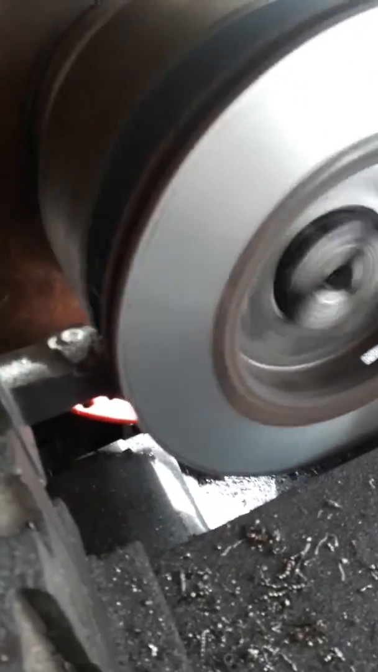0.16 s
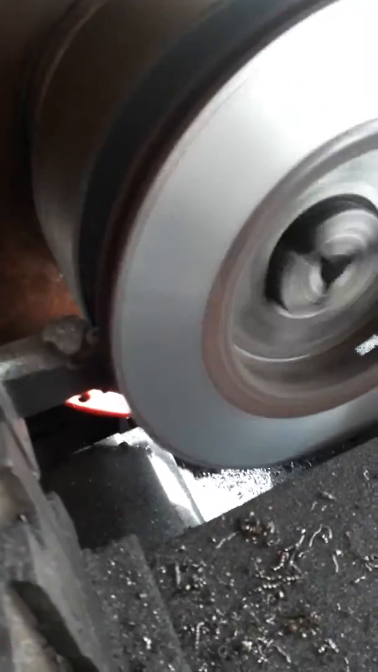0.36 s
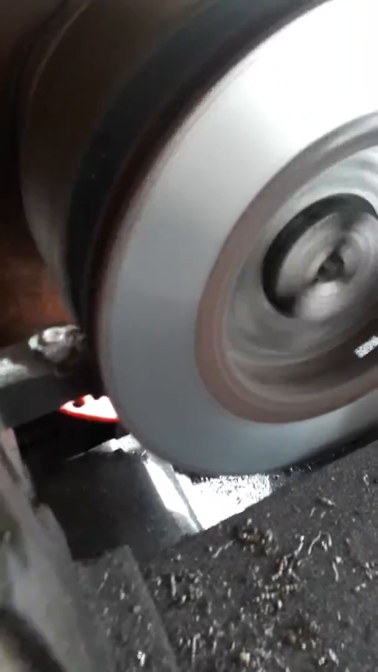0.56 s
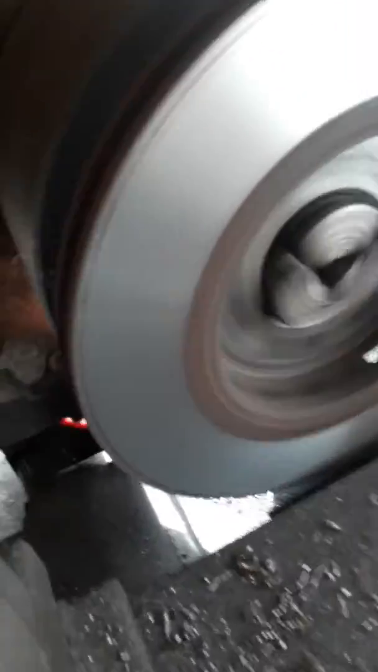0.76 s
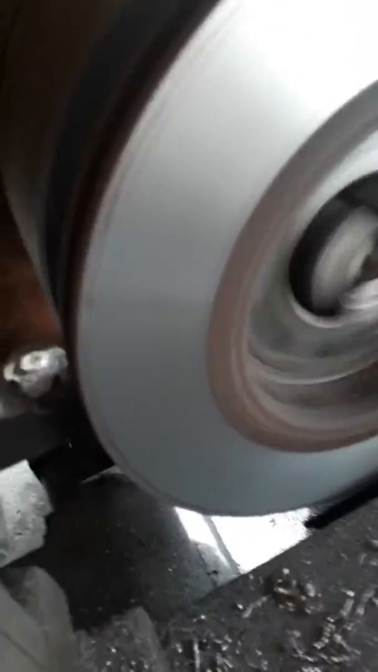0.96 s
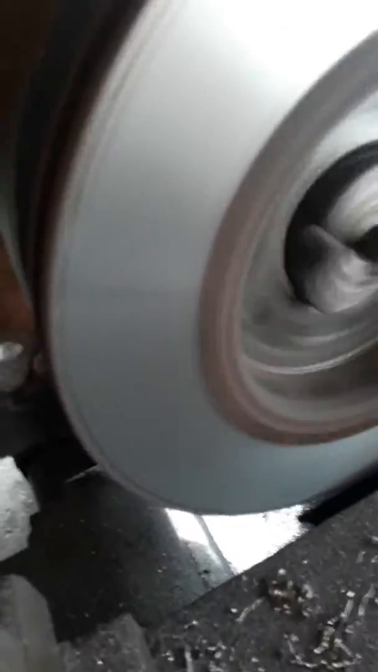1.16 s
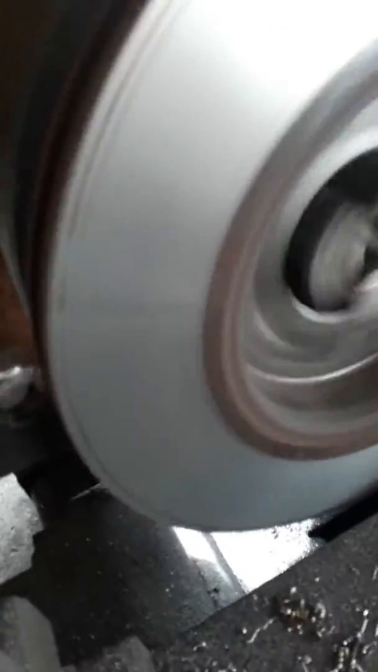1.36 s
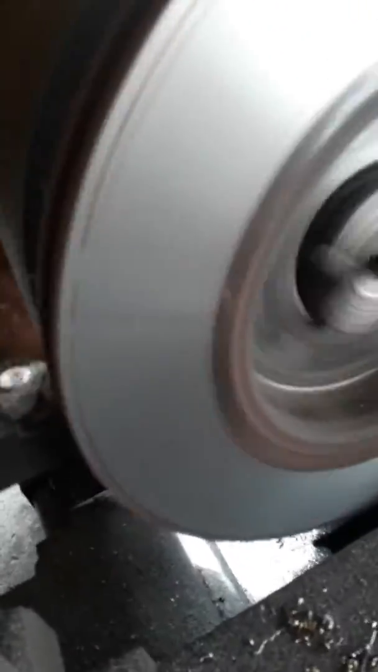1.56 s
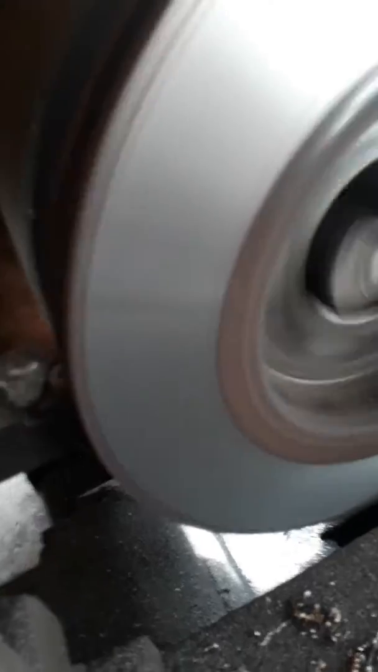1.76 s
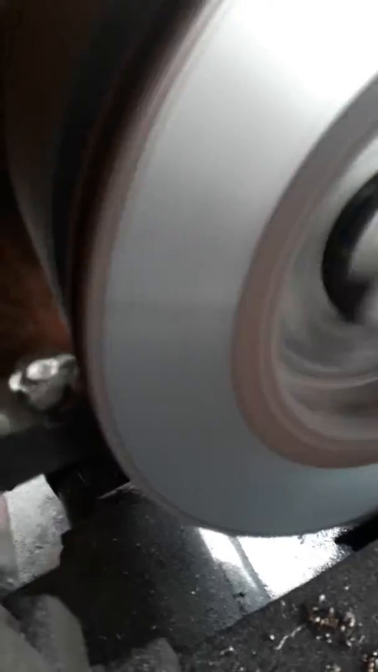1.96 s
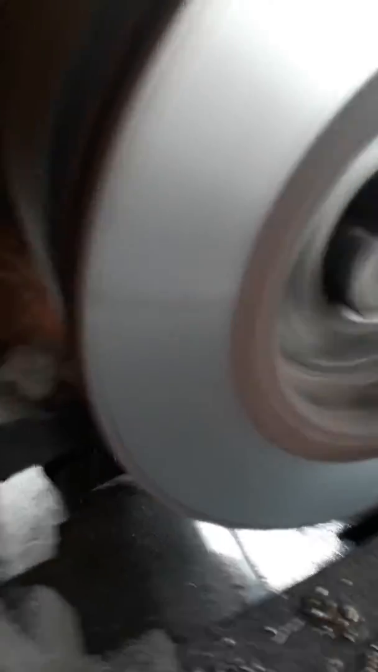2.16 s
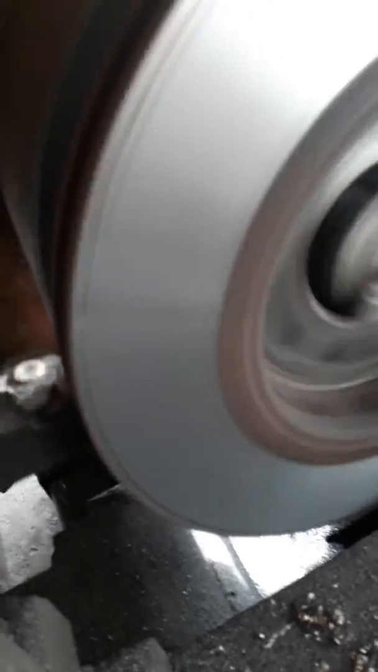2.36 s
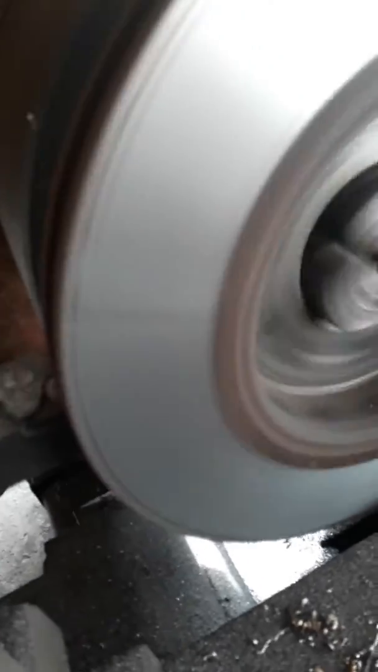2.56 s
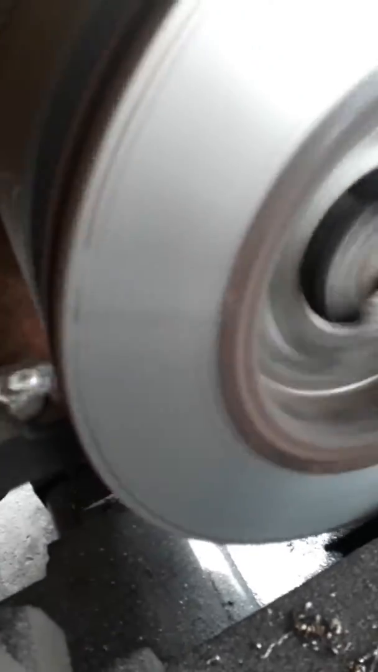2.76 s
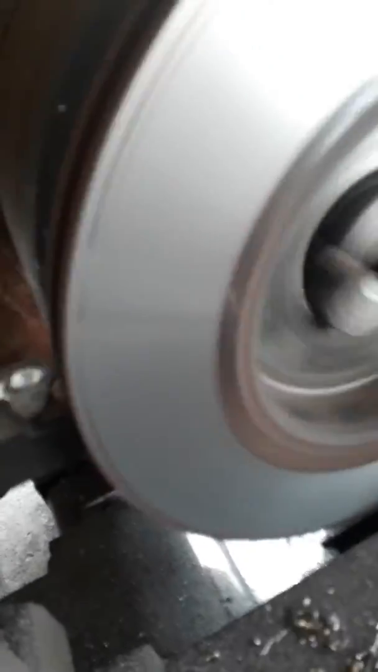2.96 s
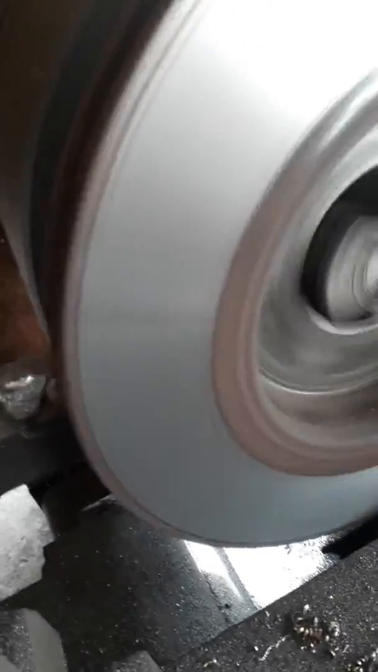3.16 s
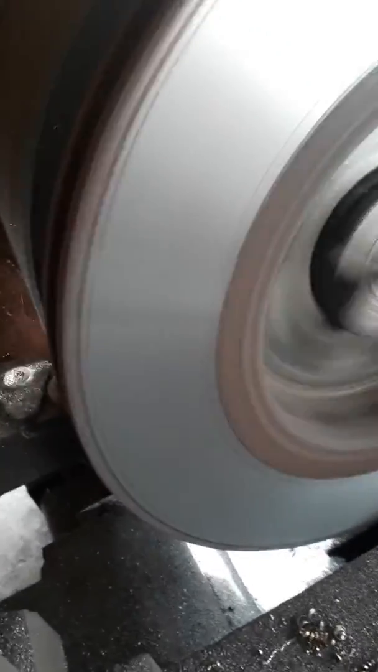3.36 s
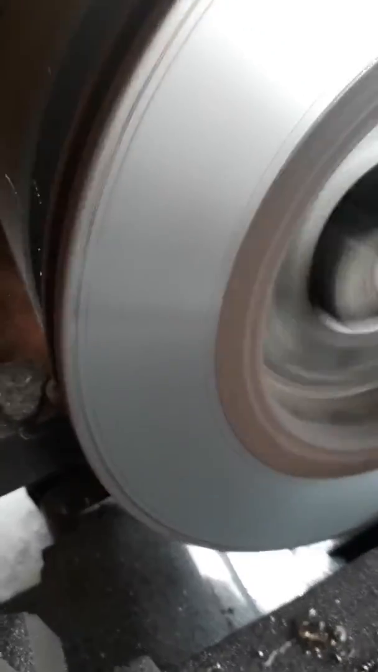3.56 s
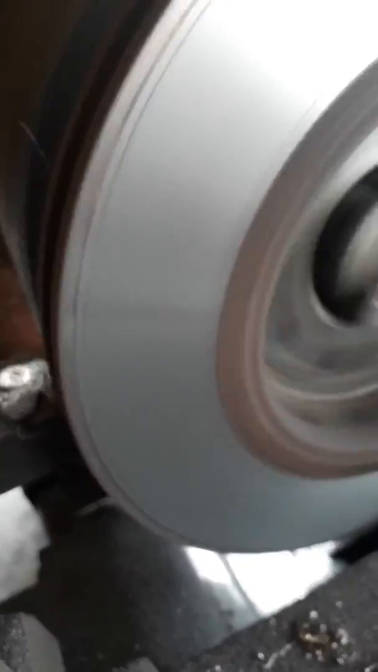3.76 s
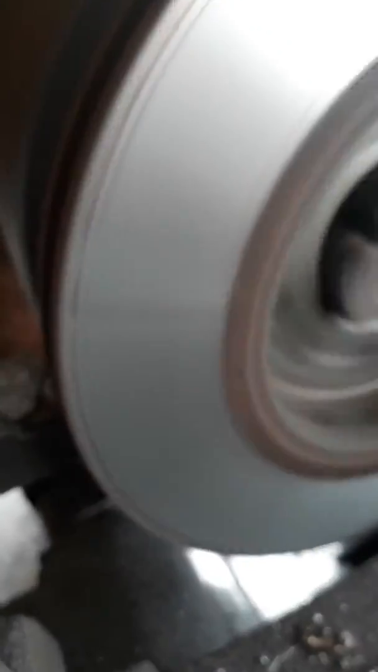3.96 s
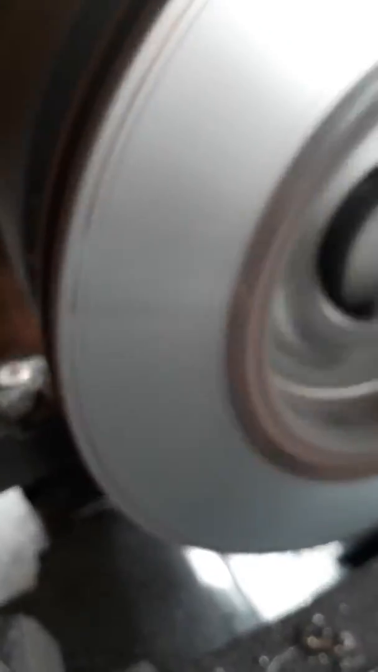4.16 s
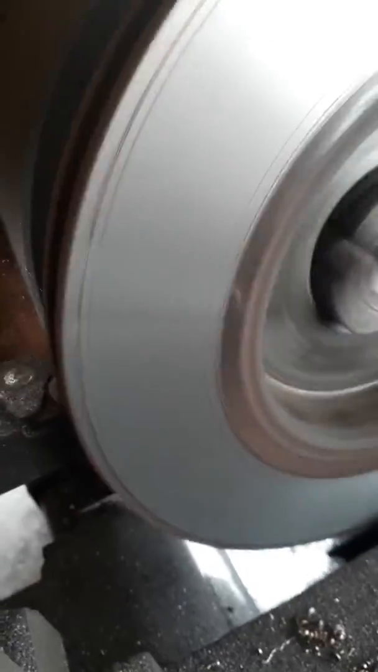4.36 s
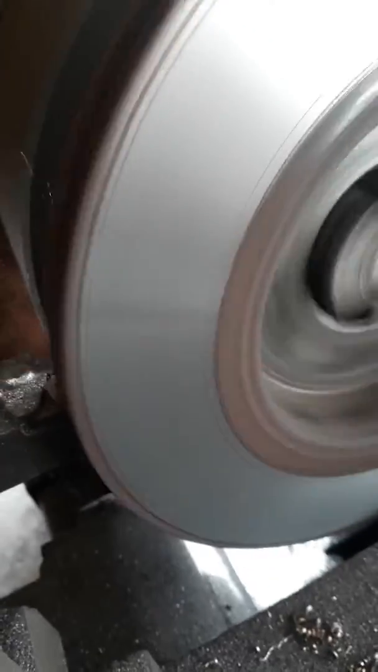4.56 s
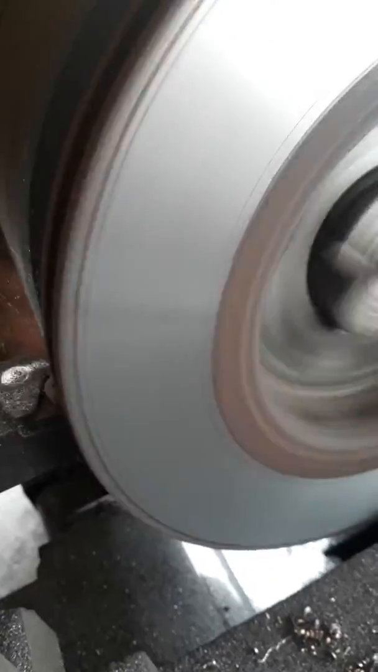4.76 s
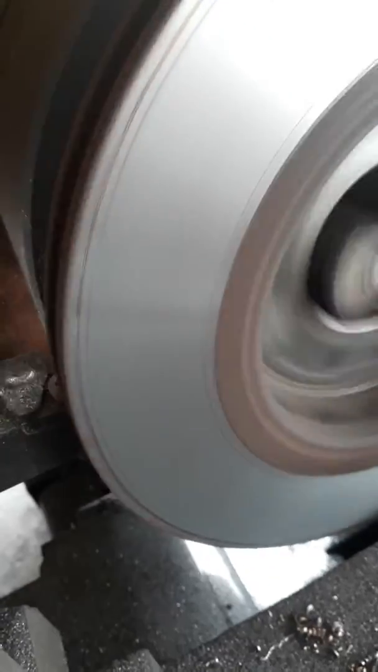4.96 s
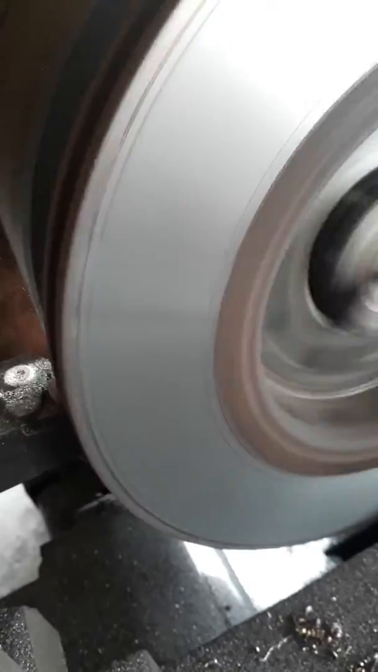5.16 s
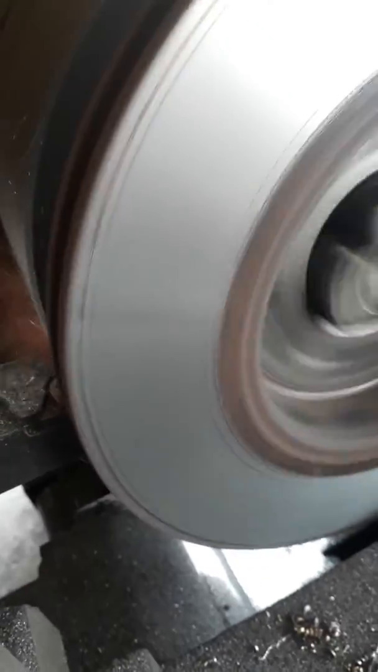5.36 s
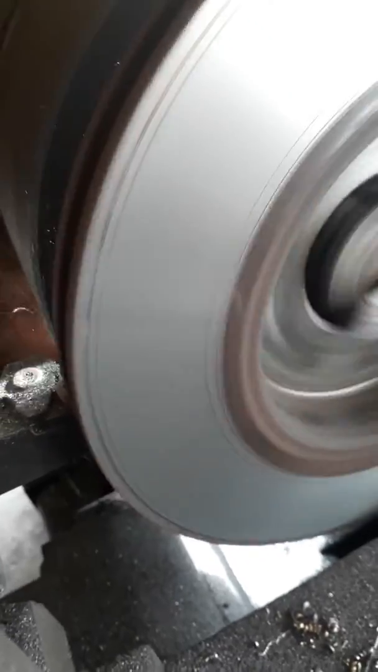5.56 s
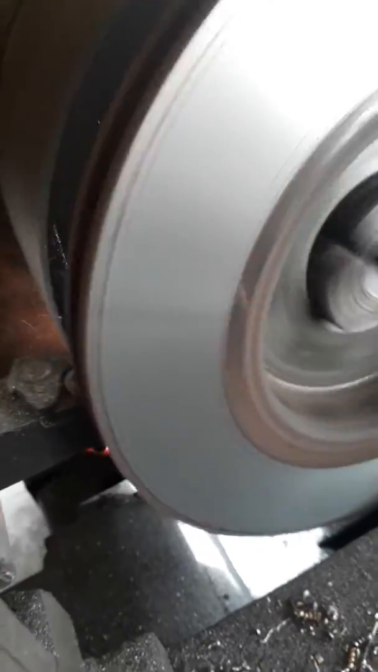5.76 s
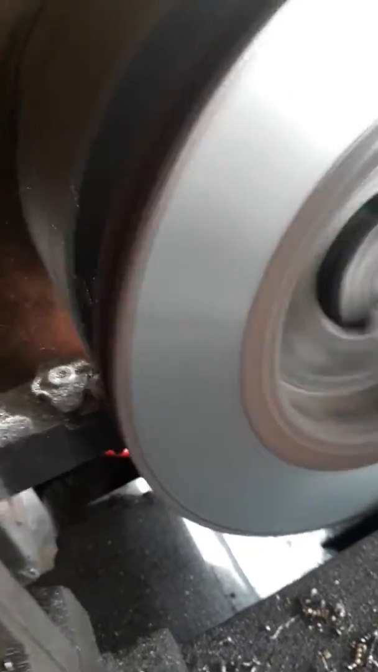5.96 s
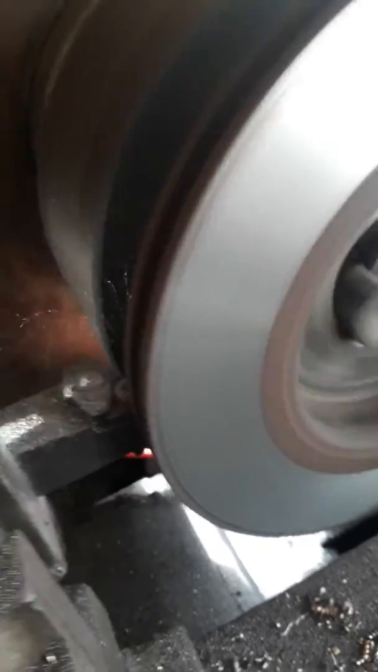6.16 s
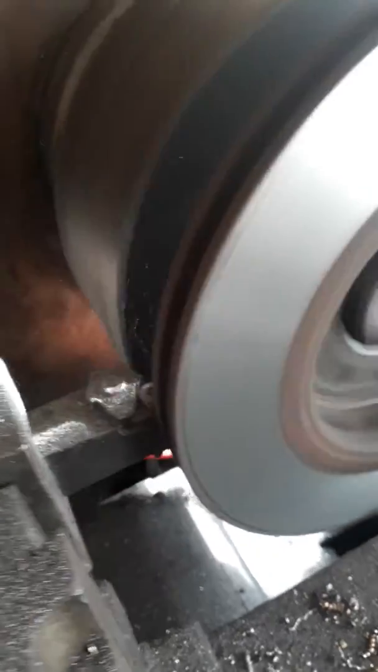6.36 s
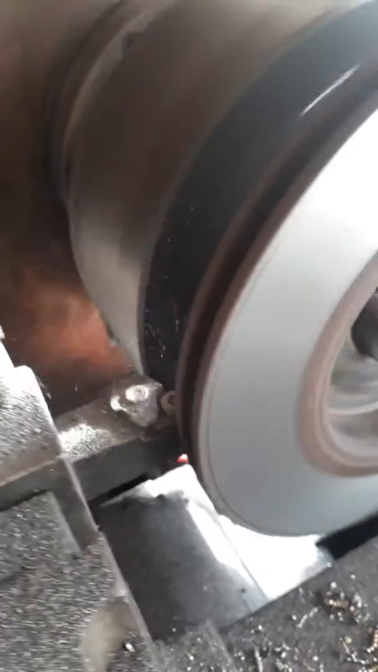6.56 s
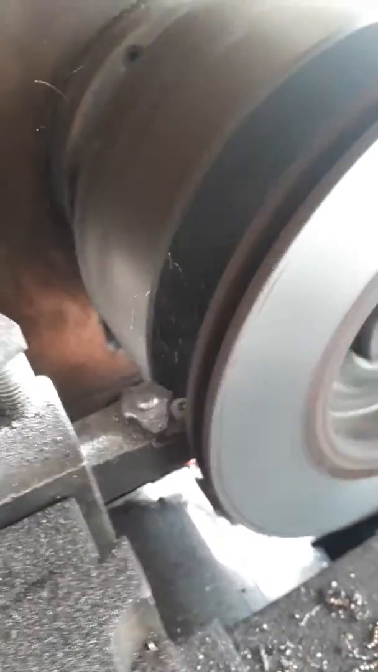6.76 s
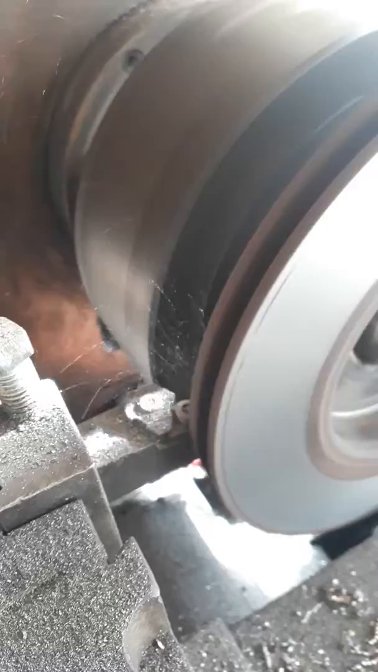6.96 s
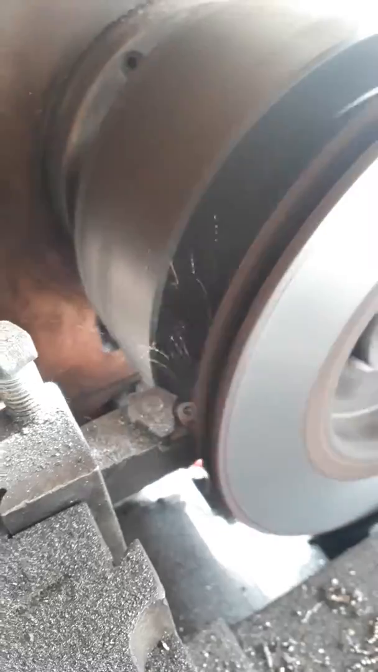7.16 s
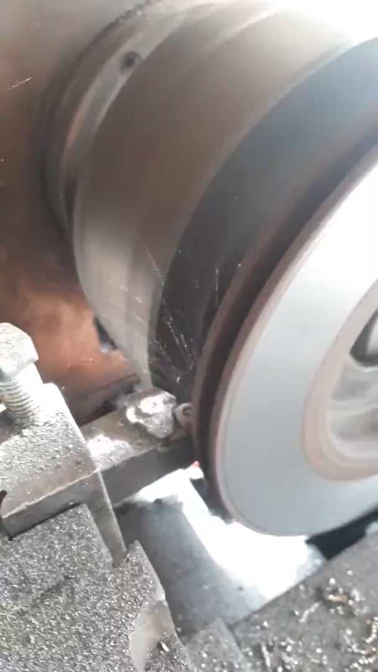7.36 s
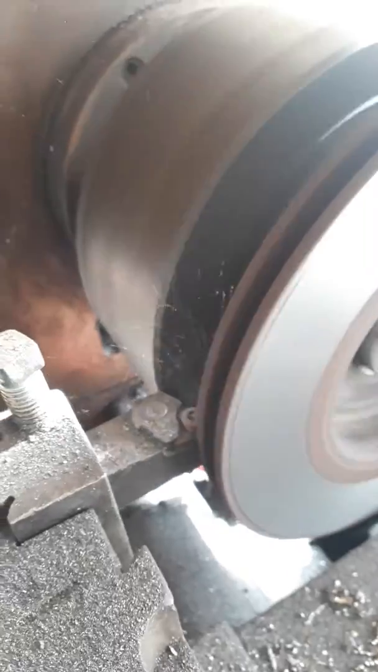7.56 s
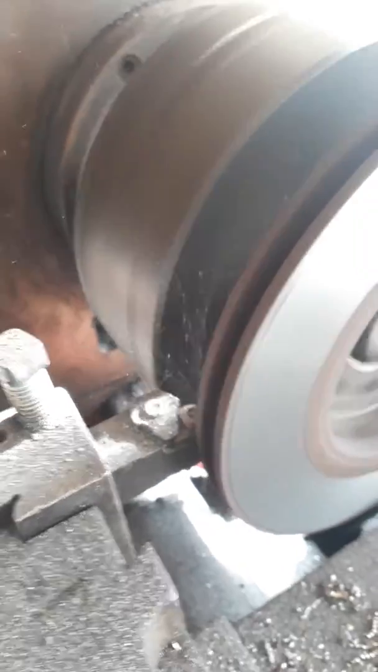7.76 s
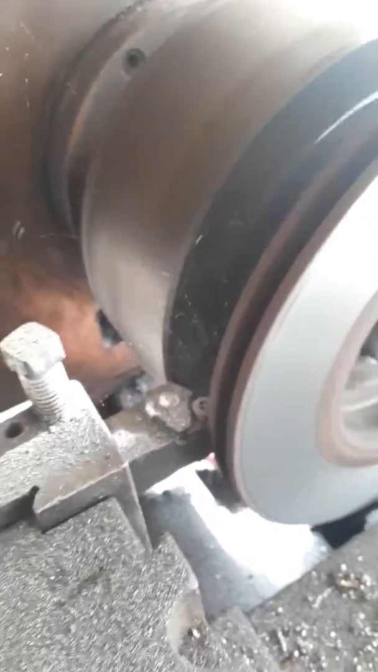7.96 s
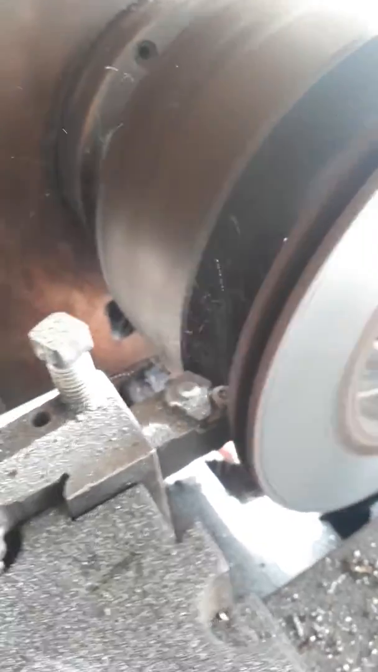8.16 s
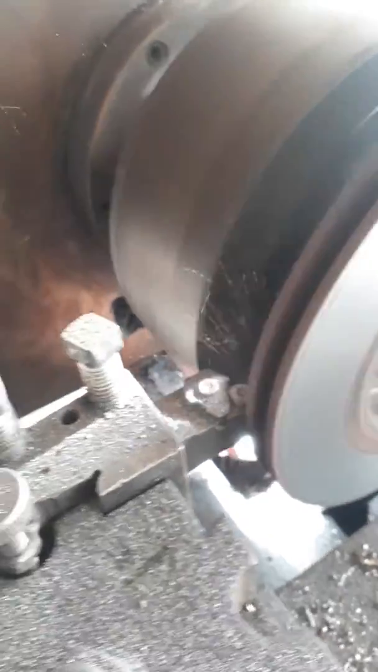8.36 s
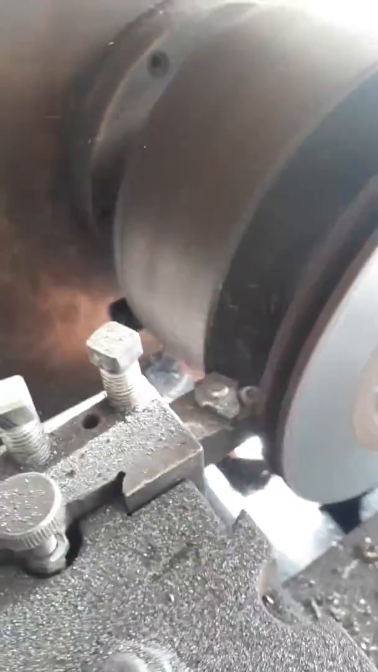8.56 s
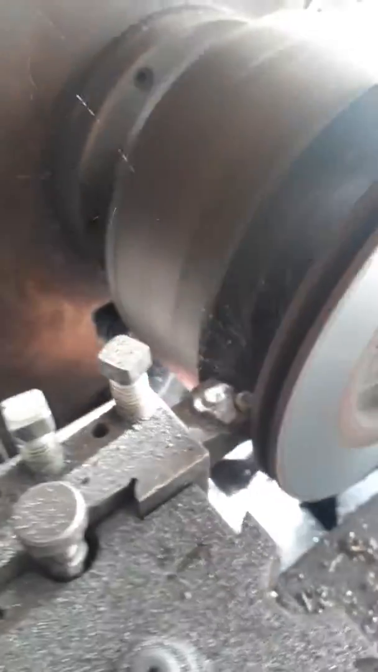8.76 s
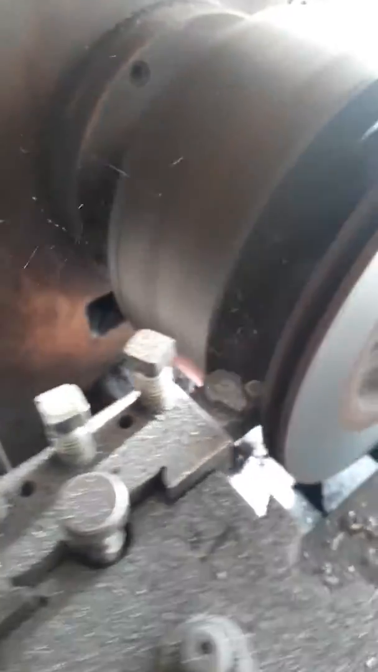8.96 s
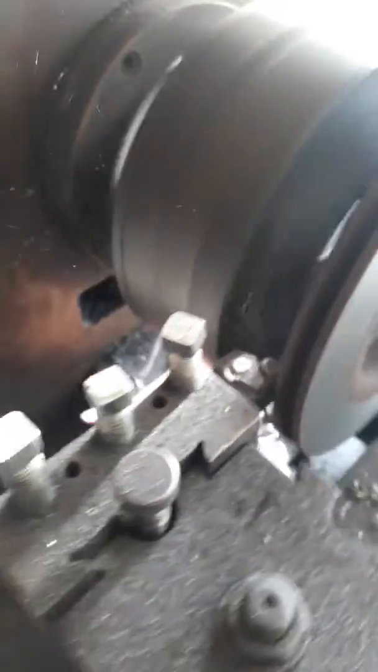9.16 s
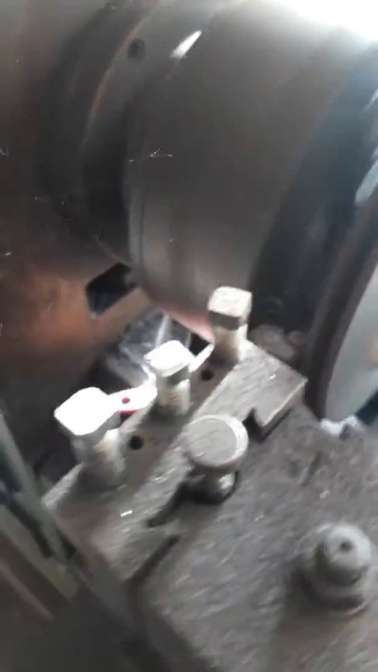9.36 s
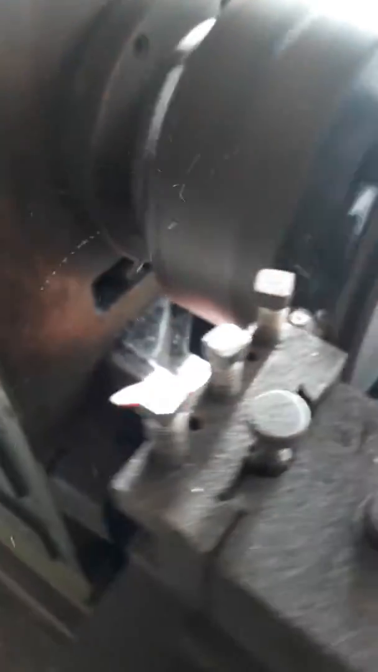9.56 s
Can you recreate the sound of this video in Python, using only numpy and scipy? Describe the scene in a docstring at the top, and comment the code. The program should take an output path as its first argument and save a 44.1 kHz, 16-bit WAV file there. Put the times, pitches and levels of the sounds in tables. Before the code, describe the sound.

In a workshop, a lathe skims a spinning cast-iron disc without pause. A rough, shrill metallic ringing made of several high pitches stands out over crackly chip hiss, a wobbling gear hum and low motor rumble. The close handheld stereo microphone moves from the disc's face to its rim, then behind the tool post, shifting the tone and balance. Short reflections come off the bed and walls.

```python
"""A whine of ringing iron stands out over hiss, singing gears and rumble: a lathe skims a cast-iron brake disc.
The crumbling chip is a random force on the disc's modes; the spin splits each mode into a wave running with the
disc and one against it. Chip hiss and rumble are shaped noise, the tool holder is noise through a resonance, and
the gears are sines locked to shafts. A stereo microphone moves from the face of the disc round to its rim."""
import sys
import numpy as np
from scipy import signal
from scipy.fft import rfft, irfft, next_fast_len
from scipy.io import wavfile

SR = 44100
rng = np.random.default_rng(int(sys.argv[2]) if len(sys.argv) > 2 else 0)


def write(x):
    x = np.atleast_2d(x).T
    wavfile.write(sys.argv[1], SR, np.round(np.clip(x, -1, 1) * 32767).astype(np.int16))


N = 427769   # samples


def from_db(db):
    """Logarithmic level: decibels to amplitude gain."""
    return 10 ** (np.asarray(db) / 20)


def rms_one(x):
    """Normalization of power: scales to rms 1."""
    return x / np.sqrt(np.mean(np.abs(x) ** 2) + 1e-20)


def in_time(rows):
    """Linear interpolation: the columns of a timed table, one value a sample."""
    seconds, *columns = np.transpose(rows)
    return [np.interp(np.arange(N) / SR, seconds, column) for column in columns]


def at_hz(points, hz):
    """Interpolation of a spectrum on a logarithmic frequency axis."""
    points_hz, values = np.transpose(points)
    return np.interp(np.log(hz), np.log(points_hz), values)


def drift(rate):
    """Low-passed chance: noise through a double pole at rate (Hz), computed every 40th sample; rms 1."""
    pole = np.exp(-80 * np.pi * rate / SR)
    noise = rng.standard_normal(N // 40 + 2002)
    slow = signal.lfilter([1], [1, -2 * pole, pole * pole], noise)[2000:]   # settled part
    return np.interp(np.arange(N) / 40, np.arange(len(slow)), rms_one(slow))


def swing(turns, top, count=1):
    """Harmonic of rotation: rises and falls count times a turn, highest at the share top."""
    return np.cos(2 * np.pi * count * (turns - top))


def tone(phase, left_db, right_db, lead):
    """Interaural level and phase: a sine of given rms level on each side, the left leading by lead (rad)."""
    return np.sqrt(2) * from_db([[left_db], [right_db]]) * np.sin(phase - np.array([[0], [lead]]))


def resonate(force, hz, width_hz, skirt):
    """Damped resonance: a narrow complex pole, and one skirt times wider that steepens the skirts."""
    poles = np.exp((2j * hz - width_hz * np.array([1, skirt])) * np.pi / SR)
    return signal.lfilter([1], np.poly(poles), force)


# likeness of the noise on the two sides: f/Hz, likeness (0-1)
SIDE_LIKENESS = [(60, 1), (200, 0.99), (330, 0.96), (500, 0.4), (950, 0.2), (1900, 0.02), (3300, 0.73),
                 (7500, 0), (15000, .15)]
# phase by which the left leads in the shared noise: f/Hz, lead/rad
SIDE_LEAD = [(60, 1.1), (200, -0.5), (300, 0.76), (700, -0.54), (1400, 4.5), (3200, -2), (5000, -6),
             (16000, -5)]
# left-right level difference of the noise: f/Hz, level/dB
SIDE_LEAN = [(60, 0.5), (120, -1), (240, 1), (480, 0.5), (950, 3.5), (1890, 0), (3770, -11.5), (4350, -14),
             (5400, 5), (7000, 9.5), (7700, 4.5), (15000, 6)]
CUTOFF_HZ = 15730   # top of the sound


def stereo_noise(colour, flicker_db, count):
    """Partial coherence: coloured noise partly shared by both sides, its overlapping bands flickering apart; rms 1."""
    size = next_fast_len(N)
    hz = np.maximum(np.fft.rfftfreq(size, 1 / SR), 1)
    shared, own = rfft(rng.standard_normal((2, size)))
    alike = np.clip(at_hz(SIDE_LIKENESS, hz), 0, 1)
    right = alike * shared * np.exp(-1j * at_hz(SIDE_LEAD, hz)) + np.sqrt(1 - alike ** 2) * own
    lean = from_db(at_hz(SIDE_LEAN, hz) * np.array([[.5], [-.5]]))
    pair = np.array([shared, right]) * colour(hz) * lean
    band_place = np.clip(np.sqrt(hz / CUTOFF_HZ), 0, 1) * count
    out = 0
    for k in range(count + 1):
        band = np.clip(1 - abs(band_place - k), 0, 1)   # triangular overlap
        flicker = from_db(flicker_db * drift(20))
        out = out + flicker * irfft(pair * band, size)[:, :N]
    return rms_one(out)


# relative spectral density of motor and headstock: f/Hz, level/dB per Hz
RUMBLE_SPECTRUM = [(12, -78), (20, -34.5), (206, -12), (412, -13), (490, -12.5), (594, -12), (654, -6),
                   (720, -5), (908, -7), (1040, -5), (1240, -10.5), (1330, -6), (1530, -13.5), (1820, -18),
                   (2000, -23), (2600, -48), (4400, -120)]
# housing resonances: f/Hz, width/Hz, level/dB of the lift relative to the rumble
HOUSING_MODES = [(124.6, 12, -0.5), (212, 31, 3.5), (291, 7.2, -1.5), (563, 60, 7), (750, 30, -6)]
RUMBLE_DB = -24


def rumble_colour(hz):
    """Resonant amplification: the housing resonances lift a broad spectrum."""
    lift = 0
    for mid_hz, width_hz, db in HOUSING_MODES:
        lift = lift + from_db(db) / np.sqrt(1 + (2 * (hz - mid_hz) / width_hz) ** 4)
    return from_db(at_hz(RUMBLE_SPECTRUM, hz)) * np.hypot(1, lift)


def rumble(view_db):
    """Filtered broadband noise: motor and headstock, below 2500 Hz."""
    noise = stereo_noise(lambda hz: rumble_colour(hz) * (hz < 2500), flicker_db=0.99, count=3)
    return from_db(RUMBLE_DB + view_db) * noise


WOBBLE_HZ = 4.258   # turns a second
WOBBLE_PITCH_HZ = 502   # pitch about which the gear swings
WOBBLE_DB, WOBBLE_LEAD = (-31, -32.5), -0.68   # (left, right dB), left lead rad
# runout once, twice and three times a turn: pitch swing/Hz, share of the turn at its top,
# level swing/dB, share of the turn at its top
WOBBLE_SWINGS = [(8, .36, 3, .15), (12, .45, 1.1, .09), (5, 0, 1.1, .1)]


def spindle_gear():
    """Modulation by eccentricity: pitch and level of a gear out of true go round with each turn, unevenly."""
    turns = WOBBLE_HZ * np.arange(N) / SR
    hz = WOBBLE_PITCH_HZ + 3.0 * drift(12)
    level_db = 1.8 * drift(10)
    for count, (pitch_hz, pitch_top, swing_db, level_top) in enumerate(WOBBLE_SWINGS, start=1):
        hz = hz + pitch_hz * swing(turns, pitch_top, count)
        level_db = level_db + swing_db * swing(turns, level_top, count)
    phase = 2 * np.pi * np.cumsum(hz) / SR
    return from_db(level_db) * tone(phase, *WOBBLE_DB, WOBBLE_LEAD)


SHAFT_HZ = 14.09
THROB_DB, THROB_TURN = 6.5, 0.14   # swell of the 20th multiple: depth, share of the spindle turn at its top
# gear tones: multiple of the shaft speed, left level/dB, right level/dB, left lead/rad
GEAR_TONES = [(9, -51, -52, 0.2), (14, -47, -47, -0.1), (20, -47, -46, 0.3), (29, -52, -52, -0.0),
              (42, -47, -50, 1.0), (46, -42, -41, 0.8), (47, -27, -27, 0.7), (48, -44, -42, 0.6),
              (49, -48, -38, 0.1), (54, -42, -46, 0.5), (60, -38, -44, 0.4), (72, -35, -42, -0.0),
              (83, -41, -45, 2.9), (91, -42, -47, -2.7), (94, -43, -40, 2.9), (141, -41, -45, -0.7)]


def gears(turns, mesh_db, third_db, other_db):
    """Harmonic locking: tones on multiples of one wavering shaft speed; the main mesh flutters least."""
    shaft = 2 * np.pi * np.cumsum(SHAFT_HZ * (1 + 0.000846 * drift(2.74))) / SR
    # main mesh, its third harmonic, other mesh, throbbing tone
    swell = {47: mesh_db, 141: third_db, 72: other_db, 20: THROB_DB * swing(turns, THROB_TURN)}
    out = np.zeros((2, N))
    for multiple, *heard in GEAR_TONES:
        flutter_db = (.7 if multiple == 47 else 2.5) * drift(5)
        phase = multiple * shaft + rng.uniform(0, 2 * np.pi)
        out += from_db(swell.get(multiple, 0) + flutter_db) * tone(phase, *heard)
    return out


# relative spectral density of the chip hiss: f/Hz, level/dB per Hz
HISS_SPECTRUM = [(900, -12), (1500, -9.5), (2200, 3.5), (2900, -7.5), (3500, -6), (3880, 0.5), (4350, -12),
                 (4600, -7.5), (5200, -7), (5900, -9), (6600, -13), (7000, -5), (7800, -13), (8300, -20),
                 (9700, -16), (11300, -44), (13300, -26), (14800, -34), (16000, -32)]
HISS_DB, HISS_FLICKER_DB = -22.5, 2.5   # level, rms flicker of each band


def chip_hiss(cut, view_db):
    """Random excitation: the chip as hiss above 600 Hz in bands that flicker independently, following the cut."""
    noise = stereo_noise(lambda hz: from_db(at_hz(HISS_SPECTRUM, hz)) * (hz > 600), HISS_FLICKER_DB, count=12)
    return cut * from_db(HISS_DB + view_db) * noise


def holder(cut, sides_db):
    """Forced resonance: chip noise in one broad mode of the tool holder, in opposite phase on the two sides."""
    ring = resonate(cut * rng.standard_normal(N), hz=2420, width_hz=180, skirt=4.5).real
    return rms_one(ring) * from_db(sides_db) * [[1], [-1]]


# reflections off bed and walls: left delay t/s, right delay t/s, level/dB
REFLECTIONS = [(.041, .057, -6), (.083, .069, -10.5)]
TREMOR_S = 0.000299   # rms delay change: the hand shakes, so path lengths waver


def shop(x):
    """Reflection with varying path length: each echo carries the other side's sound at a wavering delay."""
    out, t = np.zeros((2, N)), np.arange(N) / SR
    for *lags, level_db in REFLECTIONS:
        for side, lag in enumerate(lags):
            heard_from = t - lag - TREMOR_S * drift(2.005)
            out[side] += from_db(level_db) * np.interp(heard_from, t, x[1 - side], period=N / SR)
    return out


# disc modes: f/Hz (middle of the pair), width/Hz, angle of a nodal line from the tool at the start/degrees
DISC_MODES = [(491.7, 27, 6.8), (1069.5, 25, 17), (2404.7, 25.4, 5.7), (2600, 210, 6), (3030, 140, 5),
              (3993, 43.2, 3.7), (4890, 530, 5), (5642, 24, 6.6), (6330, 48, 5), (7179, 20, 9.4),
              (7416, 37, 9.9), (8990, 64, 14), (10650, 89, 6.9), (11420, 200, 5), (12330, 81, 17),
              (12870, 240, 5), (14130, 440, 12), (15670, 200, 5)]
# nodal diameters of each mode
NODAL_DIAMETERS = [1, 2, 3, 2, 0, 4, 0, 5, 3, 6, 6, 7, 8, 4, 9, 0, 10, 0]
# each mode before the face, backward wave: left level/dB, right level/dB, left lead/rad,
# then forward over backward wave level/dB
MODES_AT_FACE = [(-40, -39.5, 0.4, -5), (-37, -34.5, -1.04, -2), (-19, -14.5, -0.17, -0.2),
                 (-40, -41, 2, -1), (-37.5, -34.5, 3.5, -3), (-30.5, -15.5, 4.5, 4.5),
                 (-37.5, -40.5, 3.5, 0.5), (-24, -27.5, 2.5, -2.5), (-47, -45.5, 3.8, -15),
                 (-28.5, -61, 1.6, 2), (-23, -48, 0.4, -6.5), (-32.5, -48, 1.8, -13.5), (-36, -59, 1, -1),
                 (-78, -75, 7, -10), (-41.5, -41, 1.9, -0.5), (-51, -43, 1, 2.1), (-39, -36, 1.8, 2.5),
                 (-49, -48, 0.1, 1.1)]
# each mode beside the rim, same columns
MODES_AT_RIM = [(-37, -39, 1.4, -9), (-26, -40, 1.5, -9), (-22.5, -28, -2.5, 0.4), (-33.5, -30.5, 2.17, 4),
                (-39, -48, 1.3, 5), (-25.5, -27, 1, -0.8), (-31.5, -35.5, 4.5, -3.5), (-28, -31, 2.5, -2.5),
                (-42, -47, -6, -6), (-29.5, -39.5, 3.5, 2.5), (-37.5, -41.5, 0, 6), (-37.5, -50, 1.5, -5),
                (-35.5, -54, 1.5, -10), (-47, -58, -0.5, 4), (-43, -51.5, -1.4, 5), (-47, -55, 11, 1.1),
                (-38.5, -46.5, 1.3, 1.1), (-48, -56, -3, 3)]
# level added at the ends of the walk: f/Hz, low before the face left level/dB (from the face), right level/dB,
# behind the tool post left level/dB (from the rim), right level/dB
END_SHADING = [(500, -5, -4, -5, 1), (1100, 1.5, -4, -19, 3), (2360, -8, 0.5, -6, 6.5),
               (4020, -2.5, 3, -4.5, -10), (5560, -1.8, -3, 5, -6), (7300, 1.5, 8, -2, -10),
               (7440, -5.5, 0.1, 6, -8), (10000, -3.5, -6, 1, -5), (15000, -2.5, -1, 6, -1)]
PAIR_GAP_HZ, PAIR_DB = 6, -3.5   # second mode of each pair: how much higher, its gain
# from face and rim: angle round the disc between the two microphones (rad), left-right lean of the forward wave (dB)
PORT_ANGLE, FORWARD_LEAN_DB = (0.51, -0.33), (3.5, -8.5)


def disc(cut, angle, place):
    """Mode splitting by rotation: the tool drives mode pairs fixed in the disc, heard outside as travelling waves."""
    out = np.zeros((2, N))
    ends_hz, *end_columns = np.transpose(END_SHADING)
    modes = zip(DISC_MODES, NODAL_DIAMETERS, MODES_AT_FACE, MODES_AT_RIM)
    for (hz, width_hz, degrees), order, face, rim in modes:
        force = cut * rng.standard_normal(N)
        spin = np.exp(1j * order * (angle + np.radians(degrees)))
        along = resonate(force * spin.real, hz - PAIR_GAP_HZ / 2, width_hz, skirt=10.04)
        across = resonate(force * spin.imag, hz + PAIR_GAP_HZ / 2, width_hz, skirt=8.5)
        across = 1j * from_db(PAIR_DB) * across
        backward_wave = (along + across) * spin.conj()
        forward_wave = (along - across) * spin * -1j   # heard a quarter cycle apart

        # four places: low before the face, face, rim, behind the tool post
        low_left, low_right, post_left, post_right = (
            np.interp(np.log(hz), np.log(ends_hz), column) for column in end_columns)
        left_db, right_db, lead, forward_db = np.repeat([face, rim], 2, axis=0).T
        left_db = left_db + [low_left, 0, 0, post_left]
        right_db = right_db + [low_right, 0, 0, post_right]
        lean_db = np.repeat(FORWARD_LEAN_DB, 2) / 2
        for forward, wave in enumerate((backward_wave, forward_wave)):
            # the waves pass the two microphones in opposite order
            shift = order * np.repeat(PORT_ANGLE, 2) * (1 - 2 * forward)
            left_gain = from_db(left_db + forward * (forward_db + lean_db))
            right_gain = from_db(right_db + forward * (forward_db - lean_db)) * np.exp(-1j * (lead + shift))
            wave = np.sqrt(2) * rms_one(wave)   # real part then has rms 1
            for side, gains in enumerate((left_gain, right_gain)):
                out[side] += (np.interp(place, [-1, 0, 1, 2], gains) * wave).real
    return out


SPINDLE_HZ = 4.277   # turns a second
RUNOUT_DB, RUNOUT_TURN = 0.43, 0.61   # the cut deepens once a turn: depth, share of the turn at its top
# microphone: t/s, place (-1 low before the face, 0 face, 1 rim, 2 behind the tool post),
# left-right level/dB of the ring, nearness level/dB
MICROPHONE_WALK = [(0, -0.6, -0.5, -0.3), (.4, -2.7, 1, 0), (.75, -0.27, -2, 0.2), (1.1, 0.02, 0.5, -0.3),
                   (1.8, 0.31, -1.5, 0.75), (3.6, 0.03, -2.2, -0.1), (5.9, 0.23, -3, 0.7),
                   (6.2, 0.5, -5, 0.3), (6.6, 0.7, -7, 0.5), (6.9, 1.25, -2, 0.3), (8.1, 1.22, -1.5, 0.3),
                   (8.8, 1.6, -2.5, 0.5), (9.2, 5, -5.5, -0.7), (9.7, 1.8, 2.5, -3.5)]
# other sources along the walk: place, chip hiss level/dB, rumble level/dB, main mesh level/dB,
# its third harmonic level/dB, other mesh level/dB, holder left level/dB, holder right level/dB
SOURCE_VIEW = [(-1.4, -1, -0.1, -0.5, 1, -15, -22, -45), (0, 2.5, -1.74, -0.65, 4.5, -6, -48, -25),
               (1.12, -2.7, 0.5, 0, -4, 3, -13, -45), (1.27, -0.5, 1, 3, -15, 3.5, -35, -23),
               (1.5, -4.5, 0.5, 1, 7, 4, -42, -24.5), (2.7, -3, 0.5, 1.5, 5, 6, -36, -27)]


def scene():
    """Superposition: disc, holder, chip hiss, gears and rumble add up as the microphone moves."""
    place, lean_db, near_db = in_time(MICROPHONE_WALK)
    places, *columns = np.transpose(SOURCE_VIEW)
    levels = [np.interp(place, places, column) for column in columns]
    hiss_db, rumble_db, mesh_db, third_db, other_db, *holder_db = levels
    turns = SPINDLE_HZ * np.arange(N) / SR
    cut = from_db(RUNOUT_DB * swing(turns, RUNOUT_TURN))

    rings = disc(cut, 2 * np.pi * turns, place) * from_db(lean_db * np.array([[.5], [-.5]]))
    near = rings + shop(rings * from_db([[-3.0], [-1.5]]))
    near += chip_hiss(cut, hiss_db) + holder(cut, holder_db)
    near += gears(turns, mesh_db, third_db, other_db)
    return from_db(near_db) * near + spindle_gear() + rumble(rumble_db)


def record(dry):
    """Band limiting and saturation: small microphones lose deep bass, peaks are rounded, the top is cut."""
    thin = signal.sosfilt(signal.butter(2, 70.0, "high", fs=SR, output="sos"), dry)
    rounded = 1.6 * np.tanh(thin / 1.6)
    return signal.sosfilt(signal.ellip(12, .5, 65, CUTOFF_HZ, fs=SR, output="sos"), rounded)


dry = scene()
out = record(dry)
write(out)
```